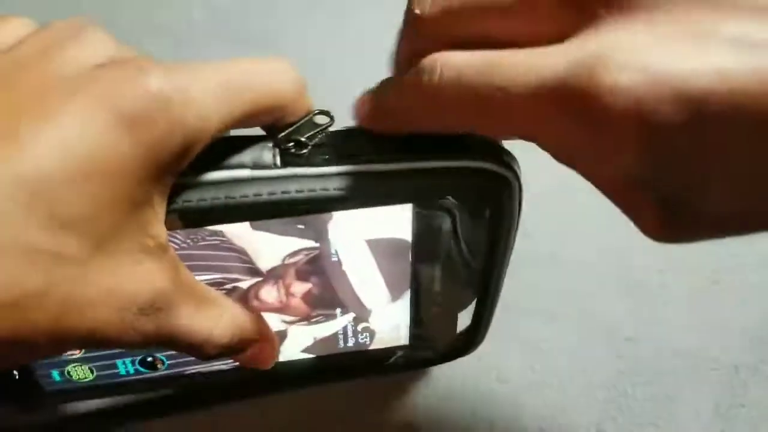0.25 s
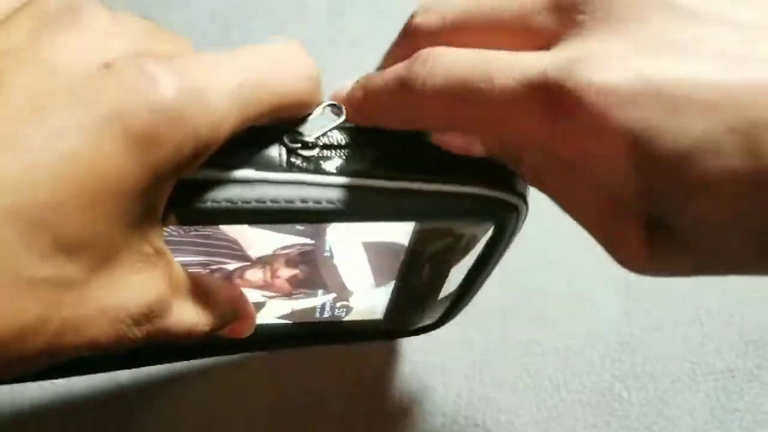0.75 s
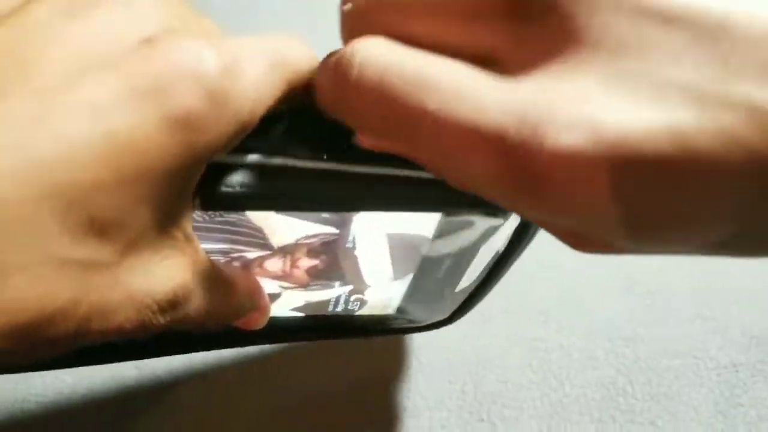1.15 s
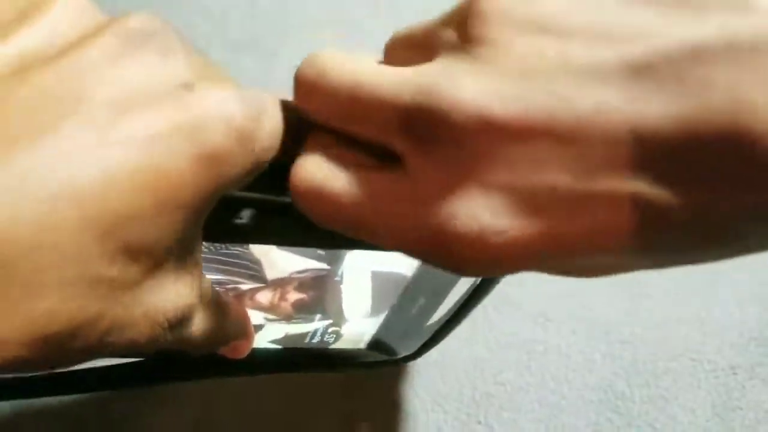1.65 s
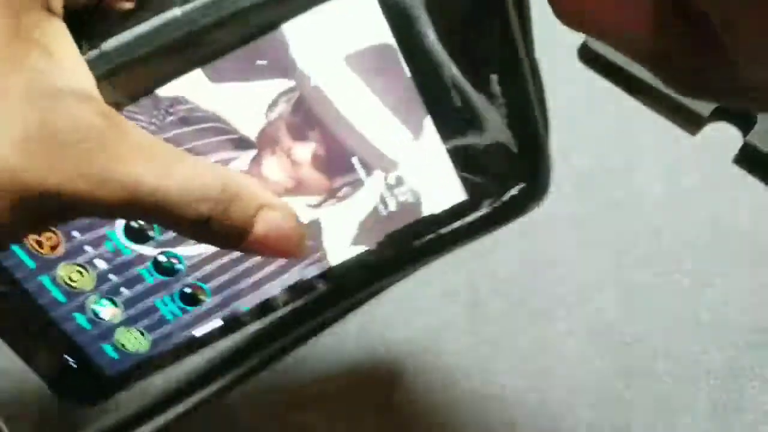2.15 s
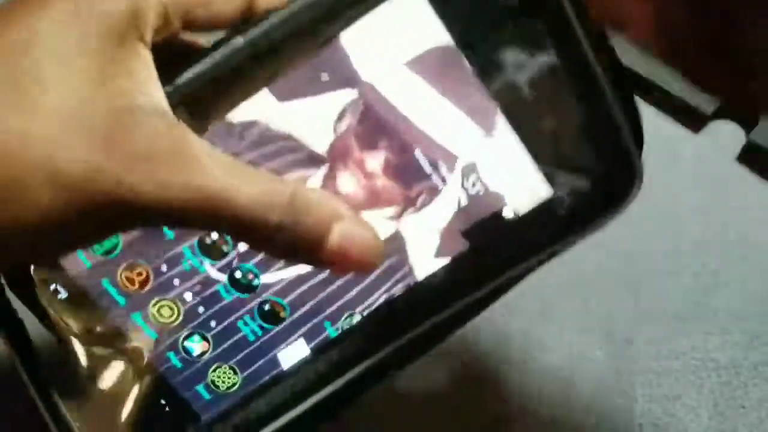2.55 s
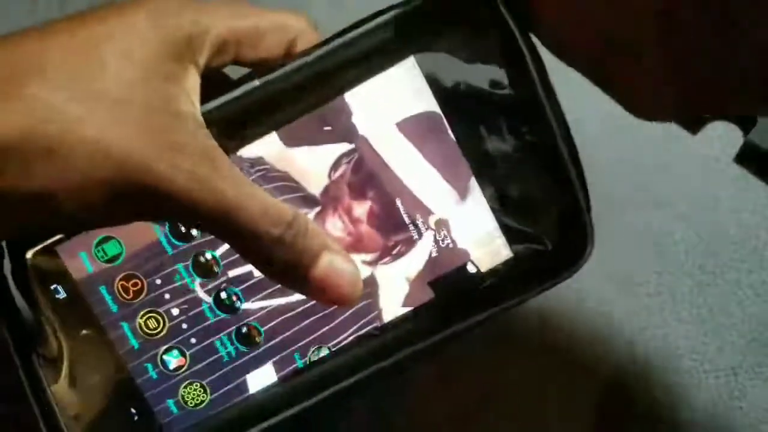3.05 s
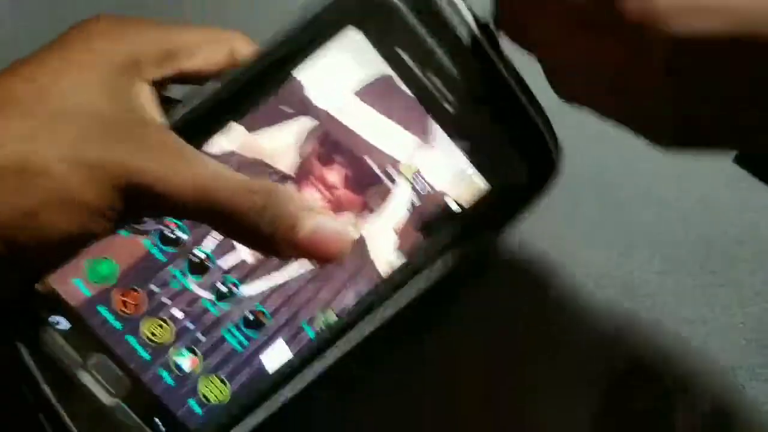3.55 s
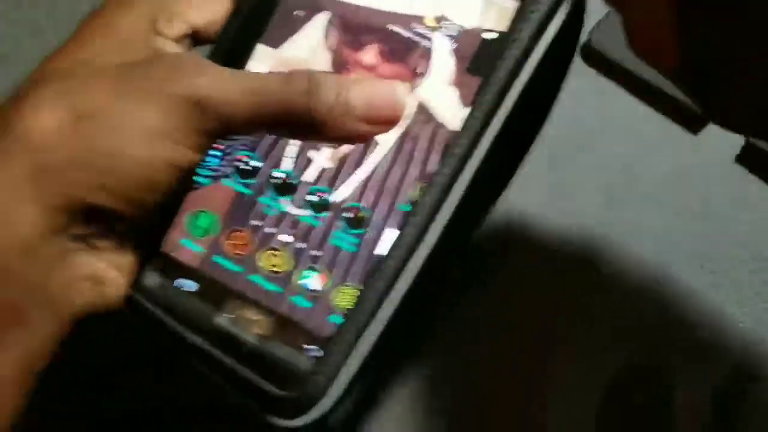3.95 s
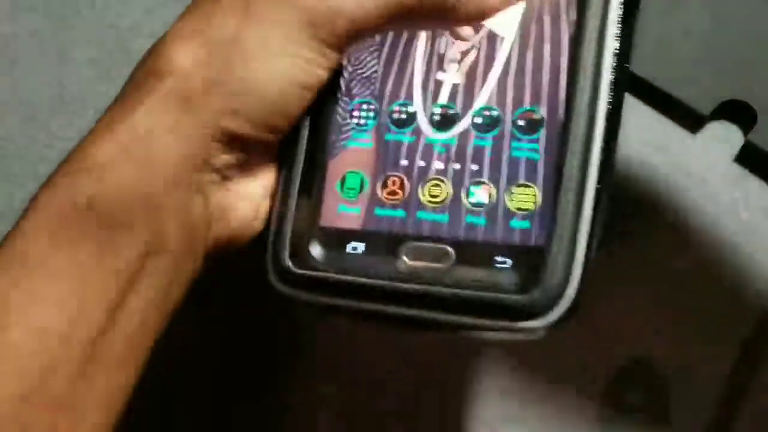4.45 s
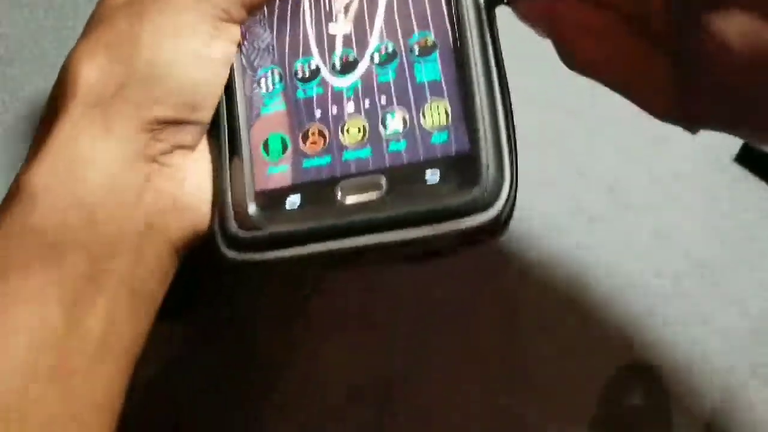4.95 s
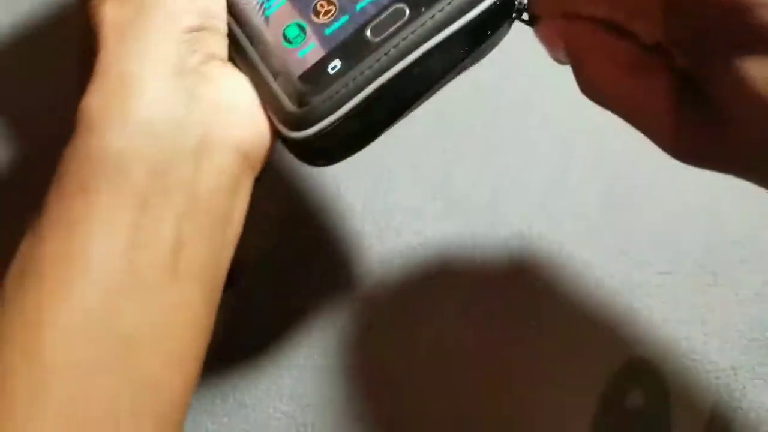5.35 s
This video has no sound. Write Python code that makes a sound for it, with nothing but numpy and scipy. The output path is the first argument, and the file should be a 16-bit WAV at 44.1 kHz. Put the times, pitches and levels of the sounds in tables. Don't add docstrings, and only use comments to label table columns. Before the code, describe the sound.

Very close in a small quiet room, hands fidget with a padded phone pouch. After a faint start, a sharp snap precedes the first quick zip. Clinks and dull taps follow, then a brighter, louder zip, a flurry of creaks, two zips close together, tiny tab jingles and a last zip cut off at the end. Stereo microphone, low room hum and light hiss.

```python
import sys
import numpy as np
from scipy import signal
from scipy.fft import rfft, irfft
from scipy.io import wavfile
from scipy.ndimage import uniform_filter1d

SR = 44100
rng = np.random.default_rng(int(sys.argv[2]) if len(sys.argv) > 2 else 0)


def transcribe(signal):
    frames = np.atleast_2d(signal).T
    limited = np.clip(frames, -1, 1)
    pcm = np.round(limited * 32767).astype(np.int16)
    wavfile.write(sys.argv[1], SR, pcm)


def rack_gain(trim_db):
    fader = np.asarray(trim_db, float)
    return 10 ** (fader / 20)


N = 247268

# frequency in Hz, level in dB.
CASE_RADIATION = [(290, -23.5), (500, 1), (630, -11.5), (778, -3), (1120, -4), (2080, -4), (2770, -6.5),
                  (4070, -3.5), (6340, -11.5), (7000, -8.5), (9100, -31.5), (15400, -120)]
# frequency in Hz, level in dB.
SLIDER_SIZZLE = [(3240, -43), (5500, -1), (6340, -13.5), (8920, -11), (11600, -8), (15300, -24),
                 (16400, -39.5)]
# frequency in Hz, level in dB.
BUZZ_COLOUR = [(200, 11.5), (380, -3), (550, -2), (800, -3), (1200, -4), (1550, -0.5), (2000, 2),
               (2600, -3)]


def stroke(rows, pan_db, sizzle_db, shell, low_hz, order_db):
    s, *columns = np.transpose(rows)
    t = np.arange(s[0], s[-1], 1 / SR)
    count = len(t)
    force_db, hz = (np.interp(t, s, c) for c in columns)

    jitter = evened(uniform_filter1d(rng.standard_normal(count), 150))
    teeth = np.cumsum(uniform_filter1d(hz, 200) * (1 + .009 * jitter)) / SR
    strength = rack_gain(1.5 * rng.standard_normal(400))[teeth.astype(int)]

    knocks = strength * (np.diff(np.floor(teeth), prepend=0) > 0) * np.sqrt(SR / hz)
    puff = .5 + np.exp(-(teeth % 1) / 0.55)
    scrape = evened(strength * puff * spread(rng.standard_normal((3, count)), 1.0))
    tooth = spread(rng.standard_normal((3, 200)), .5) * decay(np.arange(200) / SR, .006)
    rattle = evened(signal.oaconvolve(knocks[None], tooth, axes=1)[:, :count])
    body = evened(colour(.6 * rattle + scrape, CASE_RADIATION))
    sizzle = rack_gain(sizzle_db) * evened(colour(0.42 * rattle + scrape, SLIDER_SIZZLE))
    shake = rack_gain(-24) * evened(band_noise(2, [130, 320], count))

    waver_db = 2.6 * evened(uniform_filter1d(rng.standard_normal((9, count)), size=500, axis=1))
    slip = .22 * evened(uniform_filter1d(rng.standard_normal((9, count)), size=250, axis=1))
    pitched_db = force_db + .6 * np.minimum(force_db + 37, 0)
    upper_db = order_db[-1] - .8 * np.arange(1, 5)
    buzz = np.zeros(count)
    for k, partial_db in enumerate(np.r_[order_db, upper_db]):
        order = k + 1
        octaves_below = np.maximum(np.log2(low_hz / hz / order), 0)
        level_db = pitched_db + partial_db + curve_at(BUZZ_COLOUR, hz * order) - 30 * octaves_below
        buzz += rack_gain(level_db + waver_db[k]) * np.sqrt(2) * np.sin(2 * np.pi * order * teeth + slip[k])
    buzz *= np.clip((hz - 140) / 100, 0, 1)

    edges = signal.windows.tukey(count, .1) if s[-1] < 5.5 else np.minimum((t - s[0]) / .01, 1)
    sound = edges * (rack_gain(force_db - 2.5) * (body + sizzle + shake) + buzz)
    shell_hz, width_hz, shell_db = shell
    resonator = signal.iirpeak(shell_hz, shell_hz / width_hz, SR)
    rung = signal.lfilter(*resonator, np.pad(edges * buzz, (0, 2000)))
    sound = np.pad(sound, ((0, 0), (0, 2000))) + rack_gain(shell_db) * rung
    return to_ports(sound, pan_db)


# time in seconds, pull force in dB, teeth per second in Hz.
FIRST_PULL = [(1.76, -74.5, 113.6), (1.8, -60, 146.1), (1.83, -47.5, 239.6), (1.86, -39, 346),
              (1.878, -35.5, 445), (1.9, -35, 509.8), (1.917, -33.5, 523), (1.933, -42, 370.2),
              (1.99, -58.5, 200.7)]
SECOND_PULL = [(3.49, -73, 140.9), (3.518, -42, 280.9), (3.545, -34.5, 455.5), (3.562, -34, 476.8),
               (3.6, -31, 739), (3.618, -28.5, 801.4), (3.628, -23.5, 688.7), (3.64, -34, 476.4),
               (3.68, -62.5, 187)]
THIRD_PULL = [(4.695, -40.5, 249.6), (4.723, -33, 396.3), (4.744, -32.5, 376), (4.761, -33, 453.8),
              (4.783, -33.5, 494.7), (4.802, -32.5, 515.1), (4.83, -36, 424), (4.86, -45.5, 295),
              (4.9, -58, 144)]
FOURTH_PULL = [(4.89, -60.5, 109.6), (4.96, -49, 189.5), (5.006, -39, 315), (5.041, -35, 387.3),
               (5.07, -34.5, 536.7), (5.098, -29, 645.5), (5.114, -30.5, 654.9), (5.126, -41, 482),
               (5.17, -66, 199.7)]
LAST_PULL = [(5.549, -75, 172), (5.572, -42.5, 302.3), (5.593, -37.5, 431), (5.606, -32.5, 462)]
# left-right balance in dB, slider sizzle in dB.
GRIPS = [(4, -6.5), (3.5, -7), (3, -7.5), (3, -7), (2.5, -8.5)]
# frequency in Hz, width in Hz, level in dB.
SHELL_RINGS = [(500, 90, -8), (720, 70, -8), (390, 80, -4), (360, 120, 8), (500, 100, -8)]
# lowest radiated pitch in Hz, then partials 1 to 5 against the force in dB.
BUZZ_PARTIALS = [(480, -4, -3, -24, -8, -11), (520, -6, -6, -17, -10, -13), (300, -8, -8, -10, -14, -14),
                 (200, -17, -15, -9, -16, -15), (450, -8, -18, -15, -22, -25)]


def pull_zipper(case):
    pulls = [FIRST_PULL, SECOND_PULL, THIRD_PULL, FOURTH_PULL, LAST_PULL]
    for rows, grip, shell, (low_hz, *order_db) in zip(pulls, GRIPS, SHELL_RINGS, BUZZ_PARTIALS):
        add(case, rows[0][0], stroke(rows, *grip, shell, low_hz, order_db))


# frequency in Hz, level in dB.
SNAP_SPECTRUM = [(180, -17.5), (300, -37), (489, -13), (1380, -5.5), (2190, -5), (3090, 0), (3440, -1),
                 (4650, 0), (7000, -8), (9100, -3.5), (15400, -120)]
# frequency in Hz, level in dB.
VINYL_SPECTRUM = [(3530, -41.5), (6000, -13), (9440, 0.5), (11000, 10.5), (13700, 0.5), (15900, -21),
                  (16400, -46.5)]


def tick(peak_db, hz, bright_db, pan_db, ringing):
    chance = rng.standard_normal((3, 2600))
    t = np.arange(2600) / SR
    crack = decay(t, .009) * np.minimum(t / .0002, 1)
    burst = spread(chance, 0.78) * (crack + 0.23 * decay(t, 0.077))
    pair_hz = hz * 1.13 ** np.sign(chance[0, 0])
    pair = .75 * np.sin(2 * np.pi * hz * t) + .25 * np.sin(2 * np.pi * pair_hz * t)
    ring_s = min(.012, 32 / hz)
    ring = pair * decay(t, ring_s) * np.minimum(t / .0003, 1)
    soft_hz = np.clip(7000 * rack_gain(0.516 * (bright_db + 16.5)), 1.17 * hz, 17000)
    lowpass = signal.butter(3, soft_hz, fs=SR, output="sos")
    snap = signal.sosfilt(lowpass, colour(burst, SNAP_SPECTRUM))
    edge = colour(burst, VINYL_SPECTRUM)
    ringing = np.clip(ringing, 0, 1)
    low = (1 - 0.67 * ringing) * snap / abs(snap).max() + ringing * ring
    sound = low + rack_gain(bright_db + 5.0) * edge / abs(edge).max()
    return to_ports(rack_gain(peak_db + 0.5) * sound, pan_db)


# time in seconds, peak in dB, ring in Hz, left-right balance in dB.
TAB_CLINKS = [(0.076, -38, 3740, 0), (2.78, -23, 4634, 2), (3.138, -30, 3440, -2), (3.163, -37, 3486, -3),
              (3.165, -22, 3500, 0.5), (4.869, -33.5, 4130, -5), (5.291, -46.5, 3170, 3),
              (5.304, -46, 3220, -1)]
TAB_PINGS = [(1.4594, -28.5, 1014, 3), (1.4605, -21.5, 3200, 5), (3.1532, -31, 3700, -4),
             (3.1385, -32, 3360, -0.5), (3.1655, -31, 3500, 0.5), (5.114, -29, 1490, -1),
             (2.845, -38, 2170, 5.5), (2.856, -46, 2310, 7), (2.781, -32, 1330, 1), (3.129, -39, 3610, 1.5),
             (3.205, -37.5, 3420, 4), (3.277, -41, 3520, 2.5), (4.12, -49, 3600, 8.5),
             (5.198, -47, 4300, 8.5), (5.331, -38.5, 3200, 0), (5.345, -33, 3370, 7),
             (5.455, -44, 3670, -2), (5.469, -40, 3800, 3), (5.541, -45.5, 3420, 0), (5.55, -43, 3700, 0),
             (5.357, -45, 3790, 2), (5.364, -49, 3300, 1), (5.376, -48.5, 4000, 2.5), (5.408, -47, 3600, 2),
             (5.424, -51, 3900, 1), (5.436, -48.5, 4200, 3), (5.478, -49.5, 3600, 1), (5.5, -48.5, 3710, 2),
             (5.558, -44, 3700, 2)]
VINYL_SNAPS = [(0.286, -52, 4530, 7), (0.309, -51, 964, 5), (1.46, -14, 3010, 5), (1.958, -31, 1020, 4.5),
               (2.666, -25.5, 3960, 8.5), (2.681, -29, 1270, 4.5), (2.79, -31.5, 1390, 7),
               (2.948, -45, 3800, 2.5), (2.972, -36, 2660, 6.5), (3.783, -47, 3850, 3),
               (4.11, -47.5, 2900, -2), (4.659, -39, 1250, 5), (4.7, -22.5, 1180, 1.5),
               (5.113, -22, 1500, -5.5), (4.333, -25.5, 1380, -2.5), (4.348, -24, 1410, 1.5),
               (4.358, -37, 2600, 2), (4.381, -40, 1990, 6), (4.315, -39, 2700, 0),
               (5.569, -36.5, 3740, 0.5)]
SEAM_CREAKS = [(0.761, -47.5, 2700, 4.5), (0.816, -53, 1570, 6), (0.866, -51, 3460, 6.5),
               (0.949, -48, 3150, 5), (0.969, -48, 3080, 4), (1.014, -53.5, 980, 7),
               (1.079, -57, 3120, 5.5), (1.283, -52.5, 1460, 4.5), (1.316, -53, 1360, 5.5),
               (3.038, -42, 3540, -2), (3.216, -40.5, 1180, 8.5), (3.702, -31.5, 1736, 5),
               (3.935, -50, 1346, 7), (4.115, -52, 2500, 0), (4.139, -45.5, 1890, -4),
               (4.154, -44, 2550, -2.5), (4.205, -35.5, 2310, 5), (4.338, -35.5, 1420, -1),
               (4.35, -38, 1400, 2.5), (4.284, -45.5, 1900, 6), (4.293, -44, 1600, 3),
               (4.393, -45, 2200, 5), (4.422, -35, 1270, 2), (4.371, -36, 1940, 5), (4.303, -42, 1360, 7),
               (4.311, -35.5, 1900, 5.5), (4.318, -44, 1300, 4), (4.363, -37.5, 1200, 4.5),
               (4.628, -45.5, 1340, 5), (4.677, -31.5, 1200, 4.5), (4.69, -28.5, 1270, 5)]
SHELL_TAPS = [(2.257, -37, 2300, 1), (2.223, -41, 560, 4), (2.256, -35.5, 590, 6), (2.197, -48.5, 960, 6),
              (2.221, -30, 940, 3.5), (2.255, -27, 1140, 0.5), (2.749, -44, 1250, 10),
              (2.806, -43, 1345, 1), (3.641, -23, 760, 15.5), (4.382, -49, 800, 3), (4.428, -47.5, 900, 1),
              (5.331, -52, 800, 6), (5.345, -46, 850, 7), (5.384, -52, 820, 2), (5.407, -52.5, 810, 3.5),
              (4.518, -50, 1600, 3), (4.548, -41.5, 796, 5)]
BRIGHT_SCRAPES = [(3.1527, -33.5, 12000, -4), (3.1545, -39, 11800, -4), (3.1655, -35.5, 11200, 1.5)]
# brightness in dB, ring share from 0 to 1.
BLOW_KINDS = [
    (-11, 0.6),
    (-24, 0.9),
    (-17.5, .42),
    (-24.5, 0.55),
    (-46, 0.8),
    (-4, .6),
]


def strike_parts(case):
    tables = [TAB_CLINKS, TAB_PINGS, VINYL_SNAPS, SEAM_CREAKS, SHELL_TAPS, BRIGHT_SCRAPES]
    for table, (bright_db, ringing) in zip(tables, BLOW_KINDS):
        for s, peak_db, hz, pan_db in table:
            add(case, s - .0008, tick(peak_db, hz, bright_db, pan_db, ringing))


# frequency in Hz, level in dB.
CLOTH_SPECTRUM = [(350, -31.5), (600, -1), (1380, 1.5), (1520, -6.5), (1870, 2), (2160, -3), (2430, 2),
                  (2800, 3), (8000, -10), (10400, -46.5), (17600, -120)]
# top in seconds, rise in seconds, fall in seconds, cloth creak in dB,
# finger squeak against it in dB.
RUBS = [(0.075, 0.031, 0.11, -62, 8), (0.3, 0.061, 0.067, -73, 3), (0.5, 0.194, 0.12, -73, 10.5),
        (0.745, 0.13, 0.15, -66, -17), (0.955, 0.11, 0.11, -66.5, -18), (1.075, 0.046, 0.057, -62.5, -19.5),
        (1.49, 0.059, 0.08, -50.5, -7), (1.78, 0.2, .1, -76.5, -9), (2.1, 0.058, 0.35, -70.5, -15.5),
        (2.27, 0.36, 0.138, -64, -4), (2.55, 0.41, 1, -67.5, -5), (2.7, 0.048, .15, -60.5, -9),
        (2.82, 0.15, 0.101, -55.5, -8), (2.949, 0.026, 0.18, -56.5, -11.5), (3.19, 0.3, 0.22, -58, -7),
        (3.72, .1, 0.146, -67, -15), (3.93, 0.093, 0.43, -70.5, -8), (4.13, 0.017, 0.93, -58.5, -21.5),
        (4.27, 0.24, .2, -57.5, -1), (4.325, 0.14, 0.172, -48, -12), (4.68, 0.12, .1, -59, -13),
        (5.18, 0.083, 0.0445, -60, -3), (5.35, 0.094, 0.2, -59, -5.5), (5.46, 0.315, 0.16, -60.5, -2.5),
        (5.561, 0.035, 0.145, -49.5, -9.5)]


def hands():
    cloth_db, squeak_db = np.transpose(RUBS)[3:]
    creaks = rack_gain(3 * np.minimum(rng.exponential(1, N), 4)) * (rng.random(N) < 300 / SR)
    grip = evened(signal.lfilter([1], [1, -.99], creaks))
    rub = spread(rng.standard_normal((3, N)), 1.0)
    cloth = evened(colour(rub * (1 + .55 * grip), CLOTH_SPECTRUM))
    cloth_level = swells(RUBS, cloth_db - 5.5) + rack_gain(-87.5)
    squeak = evened(colour(rub * (1 + 0.33 * grip), VINYL_SPECTRUM) + 1.2 * colour(rub, SLIDER_SIZZLE))
    return cloth * cloth_level + squeak * swells(RUBS, cloth_db + squeak_db - 5.5)


# top in seconds, rise in seconds, fall in seconds, rumble in dB.
PADDING_FLEXES = [(1.6, 1.26, 0.66, -75), (1.468, 0.015, 0.087, -55.5), (2.0, 0.098, 0.22, -65),
                  (2.246, .12, 0.2, -59.5), (2.699, 0.35, 0.154, -67.5), (3.85, 0.34, 0.544, -77.5),
                  (4.25, 0.27, 0.05, -73), (4.65, 0.56, 0.22, -69), (5.19, 0.14, 0.026, -62.5),
                  (5.364, 0.21, 1.3, -62.5)]


def padding():
    return swells(PADDING_FLEXES, np.transpose(PADDING_FLEXES)[3]) * evened(band_noise(3, [110, 400], N))


def bump(peak_db, hz):
    t = np.arange(3000) / SR
    return rack_gain(peak_db) * np.sin(2 * np.pi * hz * t) * decay(t, 0.11) * np.minimum(t / 0.001, 1)


# time in seconds, peak in dB, frequency in Hz.
PALM_BUMPS = [(1.458, -49.5, 120.5), (2.258, -51, 126), (3.645, -45, 136), (4.546, -54, 149.3),
              (4.689, -45, 394)]


def bump_palm(case):
    for s, peak_db, hz in PALM_BUMPS:
        add(case, s - .002, bump(peak_db, hz)[None])


# frequency in Hz, time to fall 60 dB in seconds.
ROOM_DECAY = [(150, .12), (700, .14), (2000, .17), (6000, .19), (14000, .14)]
# delay in seconds, level in dB.
ECHOES = [
    [(.00031, -31.5), (.0009, -38), (.0021, -43.5), (.0047, -19)],
    [(.00019, -35.5), (.0011, -18), (.0023, -16.5), (.0044, -15)],
]


def room(x, wet_db):
    taps = np.zeros((2, SR // 2))
    at = np.arange(200, SR // 2 - 20, 20) + rng.integers(0, 20, (2, (SR // 2 - 201) // 20))
    np.put_along_axis(taps, at, rng.choice([-1., 1.], at.shape), 1)
    hz, t, z = signal.stft(taps, SR, nperseg=256)
    tail = signal.istft(z * decay(t, curve_at(ROOM_DECAY, hz)[:, None]), SR, nperseg=256)[1]
    tail[1] += uniform_filter1d(tail[0] - tail[1], size=60)
    tail *= rack_gain(wet_db) / np.linalg.norm(tail[0])
    tail[:, 0] = 1
    for port, echoes in enumerate(ECHOES):
        for k, (s, db) in enumerate(echoes):
            tail[port, round(s * SR)] += (-1) ** k * rack_gain(db)
    return signal.fftconvolve(x, tail / np.linalg.norm(tail[0]), axes=1)[:, :N]


# frequency in Hz, level in dB per Hz.
AIR_SPECTRUM = [(12, -70.5), (20, -42), (44, -9), (86, 0.5), (189, -13.5), (230, -10.5), (257, -24),
                (296, -15.5), (438, -30.5), (477, -25.5), (597, -29.5), (1310, -34), (5040, -36),
                (12700, -35.5), (16400, -33.5)]
# frequency in Hz, left-right likeness from -1 to 1.
AIR_LIKENESS = [(60, 0.934), (180, 0.8), (550, 0.023), (1650, -0.25), (4970, -0.48), (15000, 0.027)]


def air():
    frames, hz = N // 512 + 5, np.fft.rfftfreq(2048, 1 / SR)
    a, b, c, d, patches = rng.standard_normal((frames, 1025, 5)).T
    patches = evened(uniform_filter1d(uniform_filter1d(patches, 12, 0), 10, 1))
    same = np.clip(curve_at(AIR_LIKENESS, hz), -1, 1)[:, None]
    left = a + 1j * b
    right = same * left + np.sqrt(1 - same ** 2) * (c + 1j * d)
    z = np.array([left, right]) * rack_gain(curve_at(AIR_SPECTRUM, hz)[:, None] + 0.39 * patches)
    return rack_gain(-65) * evened(signal.istft(z, nperseg=2048, noverlap=1536)[1][:, :N])


def to_ports(x, pan_db, lag_per_db=0.93):
    hz = np.fft.rfftfreq(x.shape[-1], 1 / SR)
    half_db = np.array([[.5], [-.5]]) * pan_db
    level = rack_gain(half_db * np.clip(hz / 900, 0, 1) * np.clip(1.6 - hz / 7000, -.4, 1))
    lead = np.exp(2j * np.pi * hz * (half_db * lag_per_db - 7.5) / SR)
    return irfft(rfft(x) * (level * lead), x.shape[-1])


def spread(chance, apart):
    private = chance[1:] - uniform_filter1d(chance[1:], size=40, axis=1)
    return (chance[0] + apart * private) / np.hypot(1, apart)


def colour(x, points):
    gain_db = np.maximum(curve_at(points, abs(np.fft.fftfreq(4096, 1 / SR))), -80)
    taps = np.fft.ifft(np.exp(np.conj(signal.hilbert(np.log(rack_gain(gain_db)))))).real[:1024]
    return signal.oaconvolve(x, taps[None] / np.linalg.norm(taps), axes=1)[:, :x.shape[1]]


def swells(rows, level_db):
    t = np.arange(0, N + 64, 64) / SR
    top, rise, fall = (np.maximum(c, .003)[:, None] for c in np.transpose(rows)[:3])
    db = np.asarray(level_db)[:, None] - 30 * np.maximum((top - t) / rise, (t - top) / fall)
    return np.interp(np.arange(N) / SR, t, np.sqrt((rack_gain(db) ** 2).sum(0)))


def band_noise(order, band_hz, count):
    bandpass = signal.butter(order, band_hz, "band", fs=SR, output="sos")
    return signal.sosfilt(bandpass, rng.standard_normal(count))


def decay(t, t60):
    return rack_gain(-60 * t / t60)


def evened(x):
    return x / np.sqrt(np.mean(x ** 2) + 1e-20)


def curve_at(points, hz):
    f, value = np.transpose(points)
    return np.interp(np.log(hz + 1), np.log(f + 1), value)


def add(mix, s, sound):
    part = mix[..., round(s * SR):][..., :sound.shape[-1]]
    part += sound[..., :part.shape[-1]]


def scene():
    case = hands() + padding()
    pull_zipper(case)
    strike_parts(case)
    bump_palm(case)
    return room(case, -19.0) + air()


def roll_off(x):
    return signal.sosfilt(signal.butter(12, 16000, fs=SR, output="sos"), x)


def record(dry):
    return roll_off(dry)


dry = scene()
out = record(dry)
transcribe(out)
```